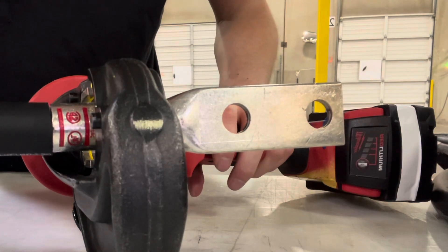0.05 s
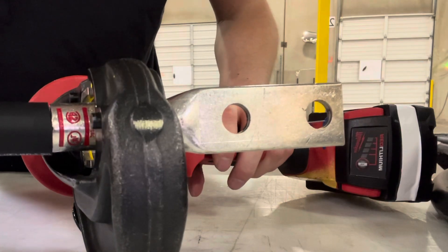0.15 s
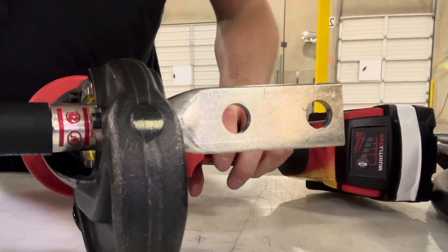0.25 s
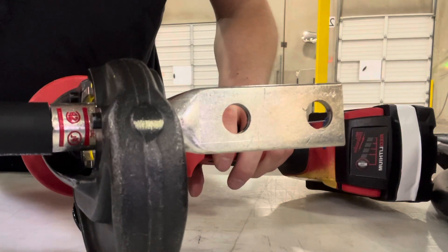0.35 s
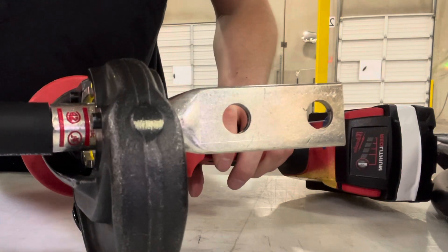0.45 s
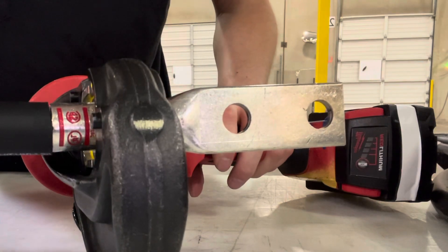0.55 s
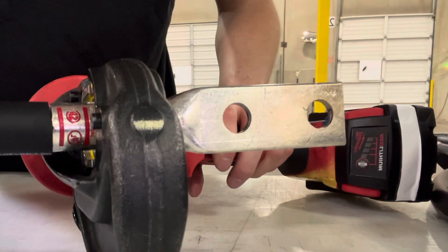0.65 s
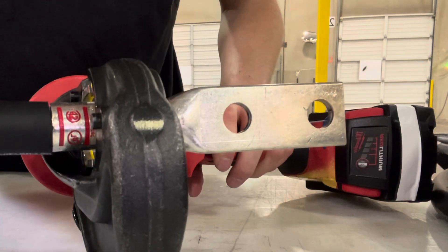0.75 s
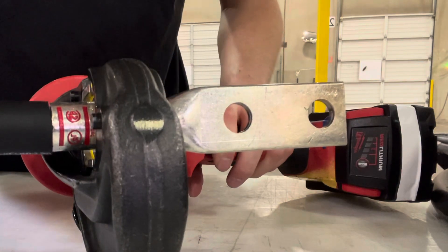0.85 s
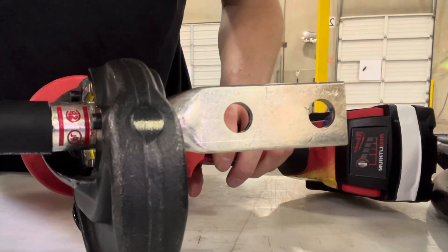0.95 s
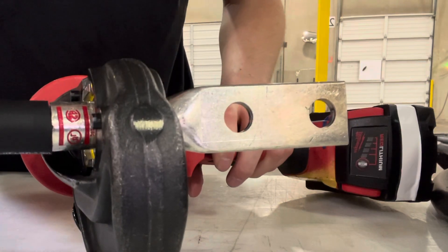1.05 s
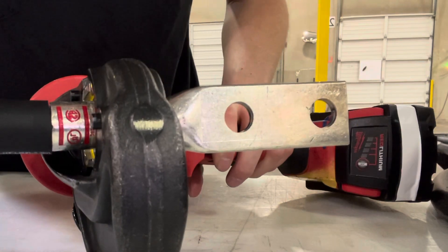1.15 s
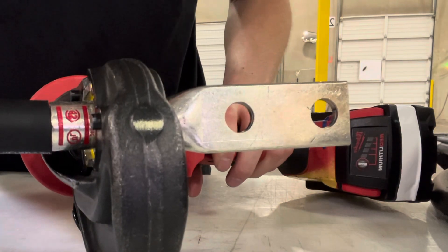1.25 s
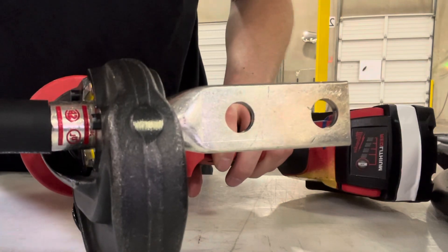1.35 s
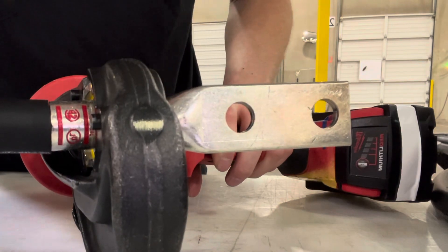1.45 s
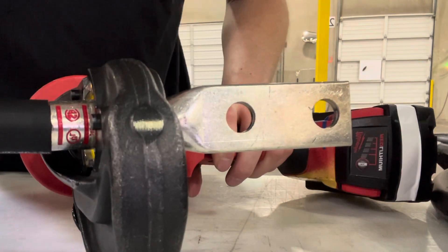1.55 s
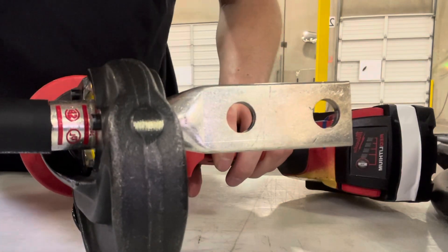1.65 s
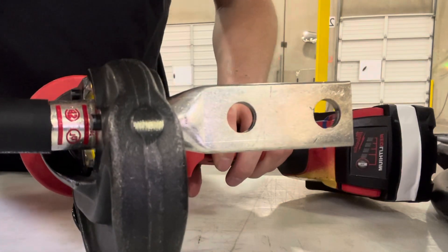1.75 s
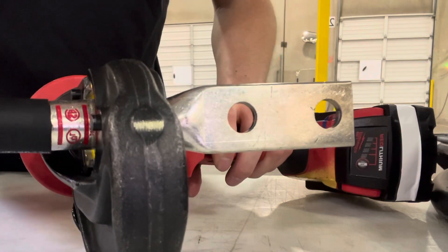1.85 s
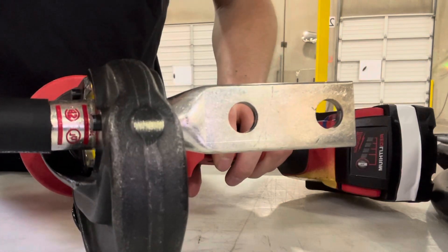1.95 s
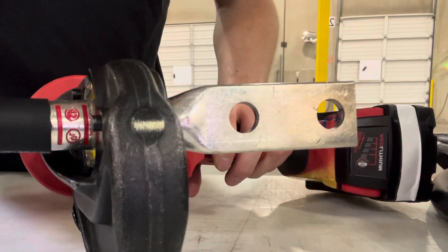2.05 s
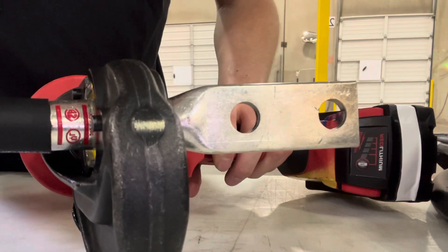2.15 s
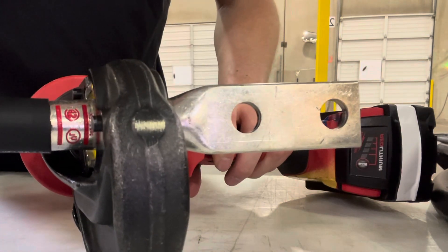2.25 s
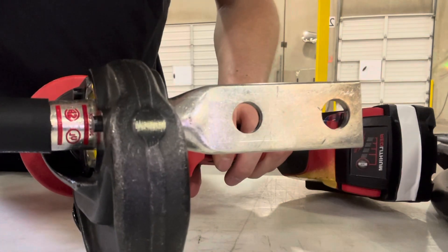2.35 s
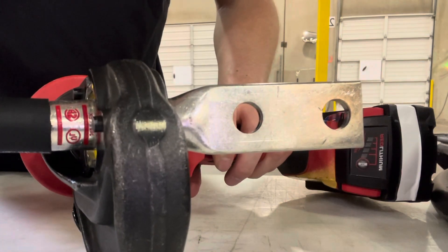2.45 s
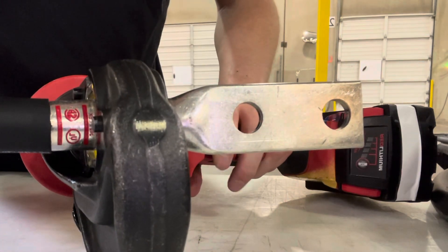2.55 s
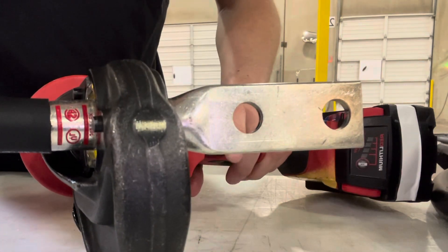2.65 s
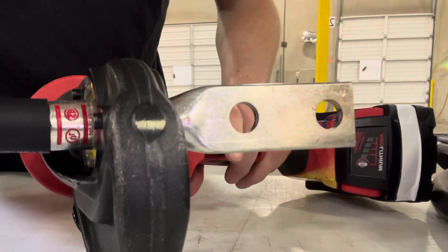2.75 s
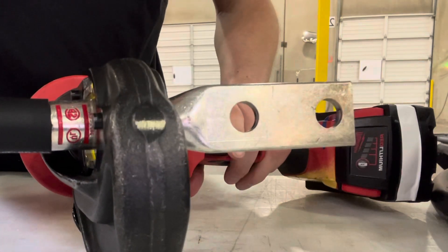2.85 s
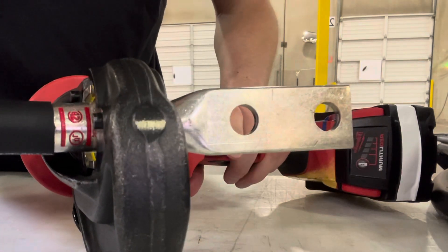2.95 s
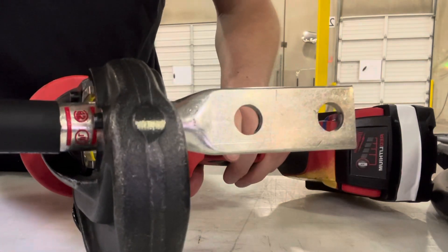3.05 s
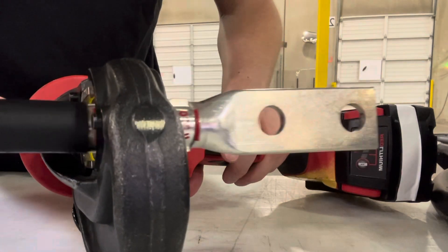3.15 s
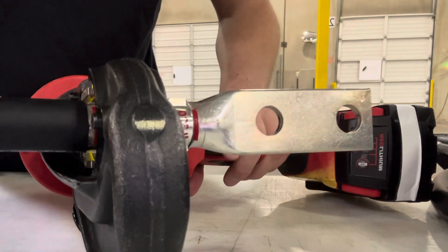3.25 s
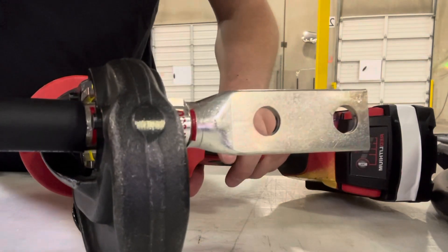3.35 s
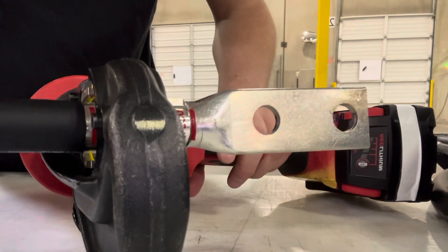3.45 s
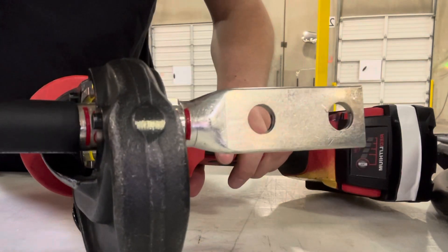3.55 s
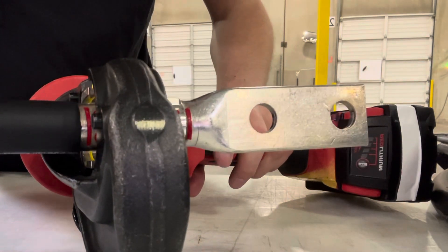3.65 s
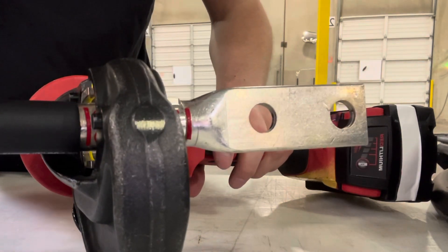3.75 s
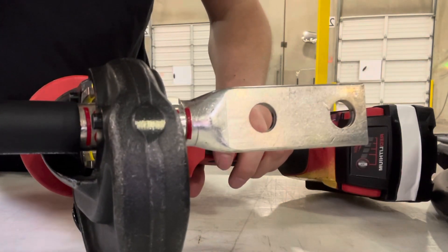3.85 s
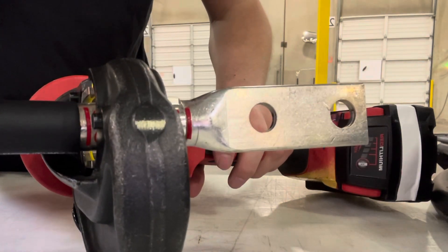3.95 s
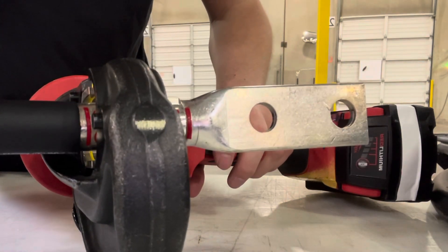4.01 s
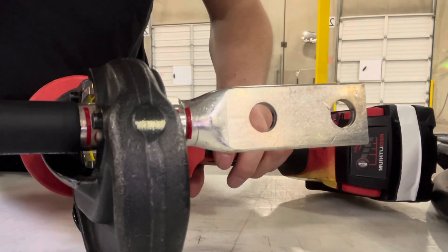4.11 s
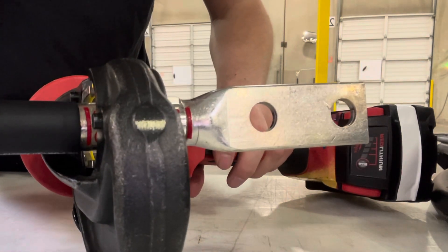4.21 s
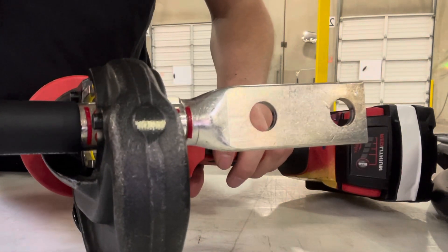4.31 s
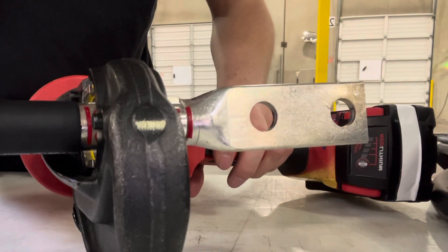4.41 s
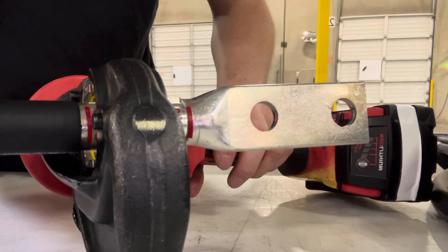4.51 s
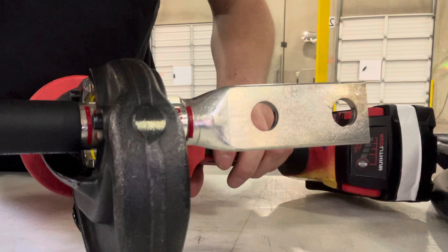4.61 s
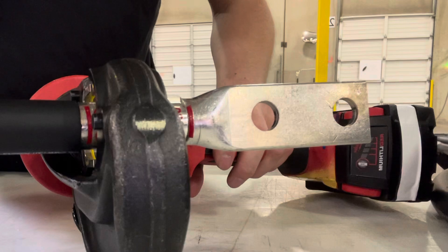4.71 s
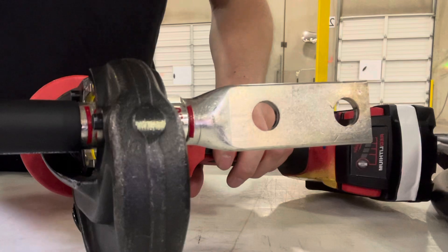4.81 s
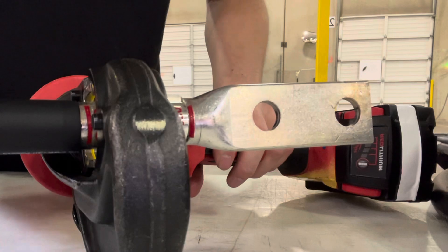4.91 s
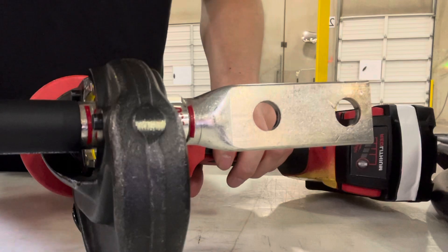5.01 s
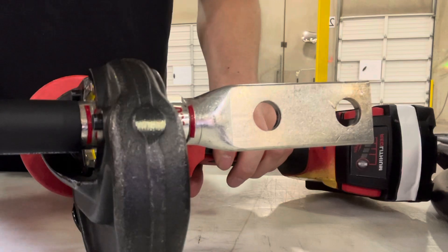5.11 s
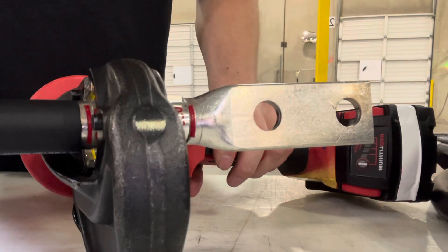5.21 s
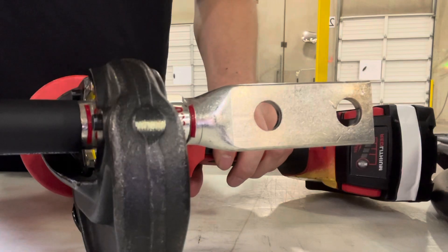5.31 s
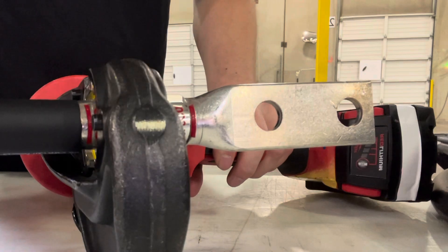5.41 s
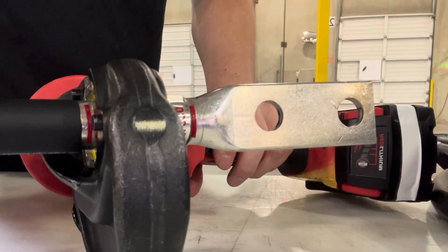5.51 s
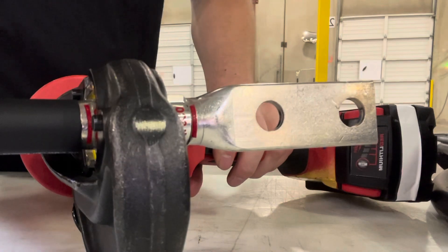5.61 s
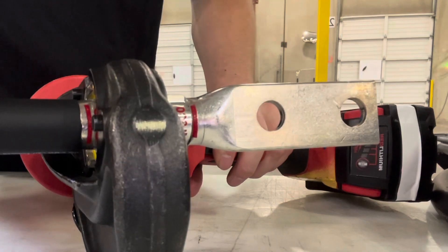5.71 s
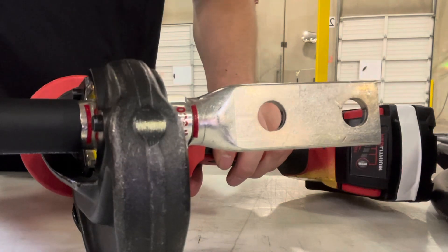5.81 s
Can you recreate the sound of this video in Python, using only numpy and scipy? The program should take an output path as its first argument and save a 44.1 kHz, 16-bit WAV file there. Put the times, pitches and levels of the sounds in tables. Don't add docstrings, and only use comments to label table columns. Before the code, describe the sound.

A cordless hydraulic crimper whines and rattles close by, laboring under pressure, stops with a snap, clicks as parts shift, then presses again.

```python
import sys
import numpy as np
from scipy import signal
from scipy.fft import rfft, irfft, next_fast_len
from scipy.io import wavfile
from scipy.ndimage import uniform_filter1d

SR = 44100
rng = np.random.default_rng(int(sys.argv[2]) if len(sys.argv) > 2 else 0)


def boost_factor(decibels):
    exponent = np.asarray(decibels, float) / 20
    return 10 ** exponent


def dump(signal):
    limited = np.clip(np.atleast_2d(signal).T, -1, 1)
    pcm = np.round(limited * 32767).astype(np.int16)
    wavfile.write(sys.argv[1], SR, pcm)


N = 258867
T = np.arange(N) / SR
PAUSE_S = 3

# pulled_s, released_s, piston_place_turns, rattle_db, valve_db
STROKES = [
    (-1, 2.436, .68, 0, 0),
    (3.826, 9, .37, .5, 1.2),
]
# pitch_hz, likeness (-1 to 1 after clipping)
LIKE = [(80, -2.5), (250, 1.5), (900, 0.56), (1800, 1), (4000, 0.73), (5000, 0.56), (6500, 0.29),
        (9000, 0.5), (11500, 1.5), (15500, -0.1)]
# pitch_hz, lead_radians
LEAD = [(0, 0.55), (1210, 0.56), (1460, 1.1), (2070, 1.95), (2500, 1.47), (3010, 1.53), (4050, 2.68),
        (4570, 1.46), (6120, 2.85), (7060, 1.5), (8530, 3.95), (11300, 5.4), (12800, 4.43), (16000, 1)]
# pitch_hz, level_db
LEFT = [(60, 1.0), (110, 2.2), (200, 2.2), (380, 1.8), (700, 0.5), (1290, 1.5), (2380, 2.25), (4400, 5.64),
        (8120, 4.2), (15000, 5.4)]


def evened(x):
    return x / np.sqrt(np.mean(x ** 2) + 1e-20)


def read(points, hz):
    f, value = np.transpose(points)
    return np.interp(np.log(hz + 1), np.log(f + 1), value)


def wander(hz):
    return evened(signal.lfilter([1], [1, -np.exp(-2 * np.pi * hz / SR)], rng.standard_normal(N)))


def body(modes, hz):
    power = sum(boost_factor(2 * db) / (1 + (2 * (hz - f) / width) ** 2) ** 1.51 for f, width, db in modes)
    return np.sqrt(power) * hz ** 2 / (hz ** 2 + 115.0 ** 2)


def ports(a, b, gain, like, lead=((1, 0), (2, 0)), left=((1, 0), (2, 0))):
    size = next_fast_len(N)
    hz = np.fft.rfftfreq(size, 1 / SR)
    a, b = rfft(a, size), rfft(b, size)
    same = np.clip(read(like, hz), -1, 1)
    right = same * a * np.exp(-1j * read(lead, hz)) + np.sqrt(1 - same ** 2) * b
    tilt = boost_factor(read(left, hz) / 2)
    return irfft(gain(hz) * np.array([a * tilt, right / tilt]), size)[:, :N]


def housing(a, b, modes):
    return evened(ports(a, b, lambda f: body(modes, f), LIKE, LEAD, LEFT))


def rings(modes, t):
    return sum(boost_factor(db - 60 * t / t60) * np.sin(2 * np.pi * hz * rng.uniform(0.93, 1.05) * t)
               for hz, db, t60 in modes)


def motor():
    # load_0_to_1, mesh_tone_db, gear_rattle_db, valve_noise_db
    by_load = [(.07, -37, -19, -23.5), (.16, -36.5, -21.5, -18), (.5, -36, -23.5, -17.5),
               (.85, -36.5, -26, -19), (1, -39.5, -26.5, -21)]
    teeth_per_pump = 10.585
    hz, load, held = speed_and_load()
    at, *laws = np.transpose(by_load)
    tone_db, rattle_law, valve_law = (np.interp(load, at, law) for law in laws)
    place, rattle_db, valve_db = (np.where(T < PAUSE_S, a, b) for a, b in np.transpose(STROKES)[2:])
    rattle_db = rattle_db + rattle_law - 8 * coasting()
    valve_db = valve_db + valve_law - 10.8 * (1 - load)
    surge_db, surge_at_s, surge_s = 7.5, 0.044, .012
    tone_db = tone_db + surge_db * np.exp(-((held - surge_at_s) / surge_s) ** 2) - 13 * coasting()
    mesh = np.cumsum(hz * (1 + 0.00033 * wander(hz=27))) / SR
    turn = mesh / teeth_per_pump + place
    a, b, c, d = rng.standard_normal((4, N))
    gate, slam = valve_gate(turn, load)
    noise = boost_factor(rattle_db) * gear_rattle(turn, a, b) + valve_noise(gate, slam, valve_db, c, d)
    noise = noise + singing_panels(gate, load, b, a)
    tones = whine_and_thrum(mesh, turn, load, tone_db)
    return since_start(0.015) * noise + ports(tones, 0 * tones, np.ones_like, [(1, 0.94), (2, 0.99)], LEAD, LEFT)


def whine_and_thrum(mesh, turn, load, tone_db):
    # order, free_db, loaded_db
    overtones = [(12, -6.5, -30), (13, -1.5, -27.5), (16, -7.5, -27.5)]
    # order, free_db, loaded_db
    pump_orders = [(1, -38, -62), (2, -46, -45), (3, -47, -74), (4, -65.5, -53)]
    whine = np.sin(2 * np.pi * mesh) * boost_factor(0.5 * wander(hz=25) + 2.1 * load * np.sin(2 * np.pi * turn))
    for order, free_db, loaded_db in overtones:
        whine += boost_factor(free_db + (loaded_db - free_db) * load) * np.sin(2 * np.pi * order * mesh)
    shake = turn + 0.025 * wander(hz=11)
    thrum = np.zeros(N)
    for order, free_db, loaded_db in pump_orders:
        level_db = free_db + (loaded_db - free_db) * load + 1.5 * wander(hz=4.0)
        thrum += boost_factor(level_db) * np.sin(2 * np.pi * order * shake)
    whine_rise_s, thrum_rise_s = 0.023, 0.078
    whine = since_start(whine_rise_s) ** 2 * boost_factor(tone_db) * whine
    return np.sqrt(2) * (whine + since_start(thrum_rise_s) ** 3 * thrum)


def gear_rattle(turn, a, b):
    # pitch_hz, width_hz, level_db
    rattle_body = [(230.8, 240, -24.5), (725, 253, -9), (1142, 270, -12), (1530, 360, -13.5),
                   (2197, 790, -16), (3527, 400, -6.5), (4028, 283, 1.5), (5130, 280, -8.5),
                   (6000, 530, -6.5), (7060, 500, -9), (8350, 1100, -11.5), (10360, 2800, -11.5),
                   (12800, 280, -12), (13760, 870, -11), (14700, 290, -16)]
    sway_db = 1.3
    chatter = boost_factor(1.12 * wander(hz=150) + sway_db * np.cos(2 * np.pi * (turn - .2)))
    return housing(chatter * a, chatter * b, rattle_body)


def valve_gate(turn, load):
    # place_turns, decay_turns, loaded_db, from_load
    knocks = [
        (.04, .1, -7, .3),
        (.445, .055, 11.5, .5),
    ]
    push_end, push_late = .37, .05
    push_gain, full_gain_load, spread_db = .85, .4, 2.8
    count = np.floor(turn + .1).astype(int)
    luck = rng.standard_normal((900, 2 * len(knocks)))[count].T
    pushing = (turn % 1 < push_end) * (turn % 1 > push_late * load)
    push = uniform_filter1d(boost_factor(2.3 * wander(hz=600)) * pushing, size=24)
    gate = .5 + push_gain * np.minimum(load / full_gain_load, 1) * push
    for k, (place, decay, db, onset) in enumerate(knocks):
        since = (turn - place - 0.012 * luck[2 * k]) % 1
        strength = np.sqrt(np.clip((load - onset) / (1 - onset), 0, 1))
        strength = strength * boost_factor(db + spread_db * luck[2 * k + 1])
        knock = strength * np.exp(-since / decay) * np.minimum(since / (0.44 * decay), 1)
        gate = gate + knock
    gate = uniform_filter1d(gate, size=12)
    return gate / np.sqrt(uniform_filter1d(gate ** 2, size=4000)), knock


def valve_noise(gate, slam, valve_db, c, d):
    # pitch_hz, width_hz, level_db
    valve_body = [(750, 295, -9.5), (1300, 580, -31), (2504, 780, -25), (3360, 460, -3.5), (3970, 280, -6),
                  (4640, 360, 2.5), (5230, 350, 1), (6500, 910, 4), (7090, 1120, 2), (8760, 490, -4),
                  (9640, 800, -8), (11460, 350, -5), (13480, 470, -1), (15000, 900, -8)]
    # pitch_hz, width_hz, level_db
    crack_body = [(12000, 5000, 0)]
    rush = boost_factor(valve_db) * housing(gate * c, gate * d, valve_body)
    return rush + boost_factor(-30) * slam * housing(d, c, crack_body)


def singing_panels(gate, load, a, b):
    # pitch_hz, width_hz, level_db, centre_load_0_to_1, load_range
    strain = [(2500, 370, -36.5, 0.42, 0.14), (11300, 1300, -29, 0.87, 0.2)]
    out = np.zeros((2, N))
    for hz, width, db, centre, reach in strain:
        panel = housing(gate * a, gate * b, [(hz, width, 0)])
        out += boost_factor(db) * np.exp(-((load - centre) / reach) ** 2) * panel
    return out


def speed_and_load():
    # time_s, pitch_hz
    speed = [
        [(0, 940.0), (0.15, 946.7), (0.64, 945.3), (0.84, 932.3), (1.18, 923.5), (1.6, 886.9), (2.0, 823.6),
         (2.25, 795.4), (2.42, 768.8)],
        [(3.93, 941.6), (4.27, 943.6), (4.5, 932.4), (4.85, 921.3), (5.25, 889.2), (5.6, 835.4), (5.87, 801.4)],
    ]
    free_hz, sag_hz = 959.6, 178
    spin_from, spin_s, spin_bend = .2, .027, 1.4
    coast_hz = 25.04
    steady = np.interp(T, *np.transpose(speed[0] + speed[1]))
    held = np.maximum(T - np.where(T < PAUSE_S, STROKES[0][0], STROKES[1][0]), 0)
    spin_up = 1 - (1 - spin_from) * np.exp(-(held / spin_s) ** spin_bend)
    hz = steady * spin_up - coast_hz * coasting()
    return hz, np.clip((free_hz - steady) / sag_hz, 0, 1), held


def since_start(rise):
    last, again = STROKES[0][1], STROKES[1][0]
    return np.clip((last - T) / 0.0087 + 1, 0, 1) + np.clip((T - again) / rise, 0, 1)


def coasting():
    coast_s = .02
    return np.clip((T - STROKES[0][1]) / coast_s + 1, 0, 1) * (T < PAUSE_S)


def clicks():
    # start_s, peak_db, ring_hz, treble_to_peak_db, thud_db
    bright = [(2.4077, -17, 4800, 3, -38), (2.5546, -45, 4150, -5, -57), (2.599, -38, 1430, -11, -64),
              (2.6104, -42, 1440, -6, -48), (2.7531, -32, 4100, -3, -52), (2.7726, -43, 4100, 0, -58),
              (2.819, -43, 4100, -10, -50), (2.8663, -48, 1430, -3, -56), (2.9582, -35, 4120, -4.5, -37.5),
              (3.031, -44, 1640, -12, -62), (3.0846, -41, 4080, -5, -38), (3.1364, -34.5, 4100, 2.5, -37.5),
              (3.1652, -35, 4060, -17, -35.5), (3.2036, -39.5, 1550, 2.5, -38),
              (3.2242, -44, 1260, -11, -41), (3.7953, -45, 4150, -4, -52), (3.8123, -28.5, 4040, -7, -45)]
    # start_s, peak_db, ring_hz, thud_db
    dull = [(0.574, -18, 3980, -34), (2.5576, -41, 3930, -58), (2.5725, -36, 1500, -57),
            (2.617, -44, 1440, -51), (2.7402, -59, 1210, -41), (2.747, -48, 1480, -42),
            (2.7816, -42, 4150, -52), (2.973, -46, 4110, -51), (2.986, -40, 4080, -39),
            (3.18, -45, 1610, -45), (3.4376, -47.5, 1480, -54), (3.632, -46, 1300, -55),
            (3.6352, -37.5, 3900, -56), (3.7156, -37.5, 3900, -47), (3.777, -44, 4000, -50)]
    # pitch_hz, level_db, t60_s
    jaw_modes = [(4080, -3.5, 0.019), (1550, -11, 0.02), (2620, -14.5, 0.0064), (3460, -7, .012)]
    # pitch_hz, level_db, t60_s
    bench_modes = [(174.6, -2, 0.14), (294, -3.5, 0.092), (524, -1.5, 0.055), (860, -9, 0.029),
                   (1200, -16, 0.028)]
    dull_treble_db = -29
    events = bright + [(s, db, hz, dull_treble_db, thud_db) for s, db, hz, thud_db in dull]
    snap_band = signal.butter(2, [900, 5500], "bandpass", fs=SR)
    tick_band = signal.butter(2, [5500, 13500], "bandpass", fs=SR)
    length = 4000
    out, t = np.zeros((2, N + length)), np.arange(length) / SR
    for s, db, hz, treble_db, thud_db in events:
        pan_db = 7.5 if 2.78 < s < 3.3 else 3
        burst = rng.standard_normal((2, length)) * boost_factor(-60 * t / 0.01) * np.minimum(t / 0.0016, 1)
        snap = signal.lfilter(*snap_band, burst)
        tick = signal.lfilter(*tick_band, burst)
        metal = 2.13 * snap + rings([(hz, 0, .012)] + jaw_modes, t) * np.array([[1], [-.6]])
        metal = metal / abs(metal).max() + boost_factor(treble_db) * tick / abs(tick).max()
        metal = boost_factor(db + 1.0) * metal * boost_factor(np.array([[pan_db], [-pan_db]]) / 2)
        thud = rings(bench_modes, t) * np.minimum(t / 0.0028, 1)
        start = round(s * SR)
        out[:, start:start + length] += metal + boost_factor(thud_db + 0.5) * thud
    return out[:, :N]


def slide():
    # time_s, level_db
    levels = [
        [(2.44, -38), (2.452, -66), (2.486, -55), (2.606, -67), (2.68, -78)],
        [(2.698, -73), (2.71, -48), (2.732, -38), (2.745, -91)],
    ]
    # pitch_hz, density_db_per_hz
    colour = [(1000, -41), (2000, -24), (3500, -5), (6250, -5), (10700, -3), (15500, -12)]
    note_hz, note_db = 3550, -0.5
    bleed, scrape = (boost_factor(np.interp(T, *np.transpose(rows), left=-150, right=-150)) for rows in levels)
    a, b = rng.standard_normal((2, N)) * boost_factor(2 * wander(hz=200))
    hiss = evened(ports(a, b, lambda f: boost_factor(read(colour, f)), LIKE, LEAD, LEFT)) * boost_factor(-3.0)
    note = boost_factor(note_db) * np.sin(2 * np.pi * np.cumsum(note_hz * (1 + .004 * wander(hz=60))) / SR)
    return (bleed + scrape) * hiss + bleed * note * np.array([[1], [-.3]])


def room(x):
    level_db, t60_s = -35.5, 0.67
    t = np.arange(SR // 2) / SR
    tail = rng.standard_normal((2, len(t))) * boost_factor(-60 * t / t60_s) * (t > .008)
    return boost_factor(level_db) * signal.fftconvolve(x, tail / np.linalg.norm(tail[0]), axes=1)[:, :N]


def hum():
    # pitch_hz, density_db_per_hz
    colour = [(30, -41), (60, -25), (90, -1), (160, -1.5), (220, -5), (360, -11.5), (600, -19),
              (735, -17.5), (950, -22.5), (1500, -28), (2600, -41.5), (4100, -40), (6000, -48),
              (14000, -57)]
    # pitch_hz, likeness
    hum_like = [(60, 1), (240, 0.89), (950, -0.034), (3770, 0.038), (15000, 0.073)]
    # pitch_hz, level_db
    fan_lines = [(721.4, -69.5)]
    hum_db, left_db = -52.5, 2
    lift_db, lift_at_s, lift_s, duck_db_per_s = 4.5, 3.0, .1, -3.5
    a, b = rng.standard_normal((2, N))
    level_db = hum_db + lift_db / (1 + np.exp((lift_at_s - T) / lift_s)) + 2.2 * wander(hz=9.6)
    level_db = level_db + duck_db_per_s * np.maximum(T - STROKES[1][0], 0)
    noise = evened(ports(a, b, lambda f: boost_factor(read(colour, f)), hum_like))
    fan = sum(boost_factor(db + 52) * np.sin(2 * np.pi * hz * T) for hz, db in fan_lines)
    return boost_factor(level_db) * (noise + fan) * boost_factor(np.array([[left_db], [-left_db]]) / 2)


def scene():
    tool = motor() + clicks() + slide()
    return tool + room(tool) + hum()


def dropouts(x):
    # from_hz, to_hz, share_of_time_free, share_of_time_loaded
    holes = [(1860, 2030, .05, .45), (2860, 3140, .7, .08), (4420, 4630, .8, .2), (5400, 5600, .45, .25),
             (7800, 8200, .5, .2), (8850, 9350, .1, .25), (12700, 13100, .5, .12), (15250, 15500, .75, .05),
             (15500, 16000, .85, .2)]
    hz, t, z = signal.stft(x, SR, nperseg=2048)
    sag = np.clip((np.interp(t, T, speed_and_load()[1]) - .08) / .4, 0, 1)
    running = np.interp(t, T, since_start(.01))
    settled = np.interp(t + .04, T, since_start(.18))
    runs, below, above = uniform_filter1d(rng.standard_normal((len(t), len(holes), 3)), size=3, axis=0).T
    rank = runs.argsort(1).argsort(1) / len(t)
    for k, (low, high, free, loaded) in enumerate(holes):
        dropped = (rank[k] < free + (loaded - free) * sag) & (settled > .5)
        spill = .8 * (high - low) * np.maximum([below[k], above[k]], -.15)
        inside = (hz[:, None] > low - spill[0]) & (hz[:, None] < high + spill[1])
        z[:, inside & dropped] *= .02
    z[:, hz > 14000] *= np.where(running > .5, 1, .2)
    return signal.istft(z, SR, nperseg=2048)[1][:, :N]


def top_cut(x):
    return signal.sosfilt(signal.butter(12, 16470, fs=SR, output="sos"), x)


def record(dry):
    dry = signal.sosfilt(signal.butter(3, 60, "highpass", fs=SR, output="sos"), dry)
    dry = 1.2 * np.tanh(dry / 1.2)
    dry = signal.oaconvolve(dry, signal.firwin(401, 15700, fs=SR)[None], "same")
    return top_cut(dropouts(dry))


dry = scene()
out = record(dry)
dump(out)
```